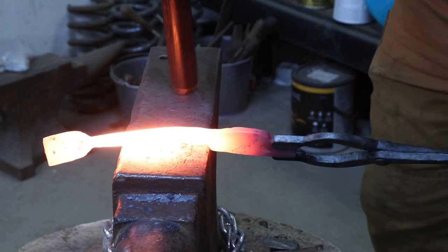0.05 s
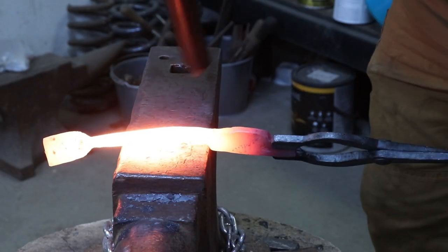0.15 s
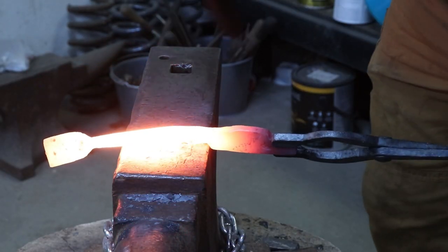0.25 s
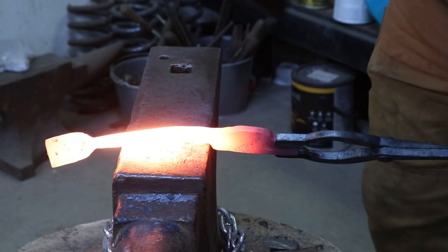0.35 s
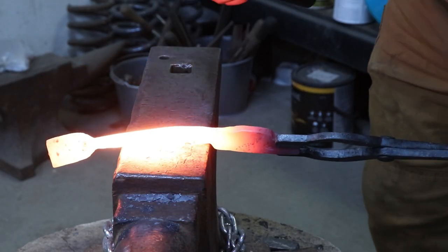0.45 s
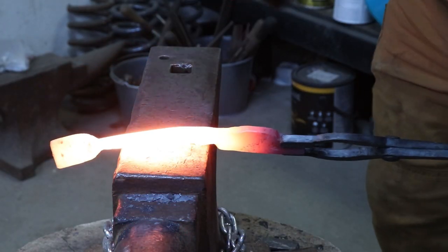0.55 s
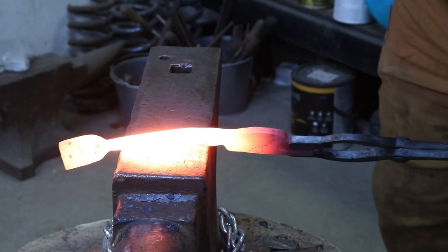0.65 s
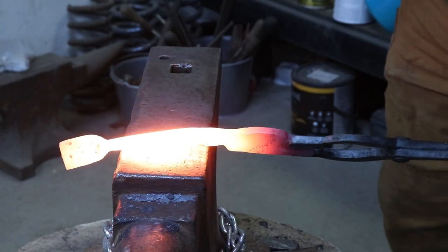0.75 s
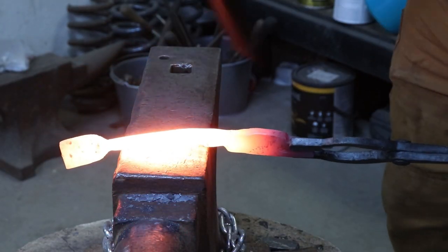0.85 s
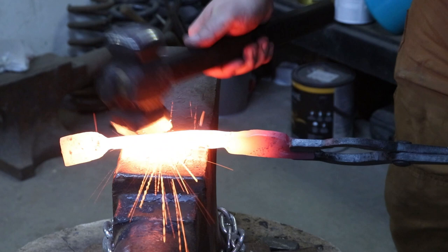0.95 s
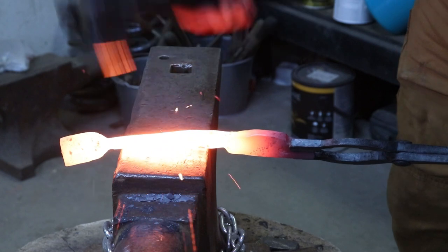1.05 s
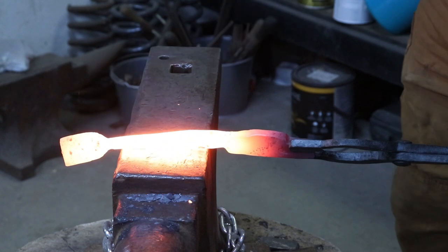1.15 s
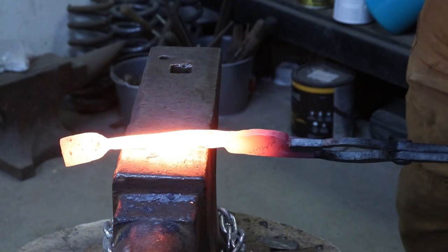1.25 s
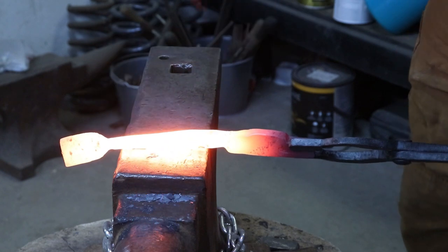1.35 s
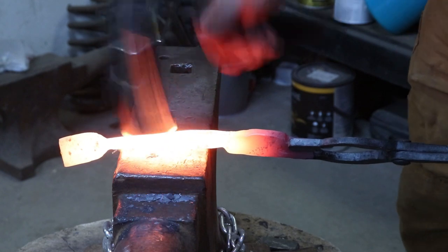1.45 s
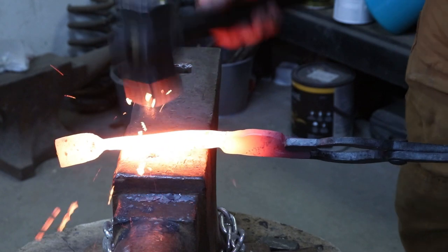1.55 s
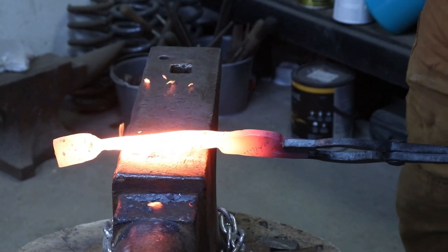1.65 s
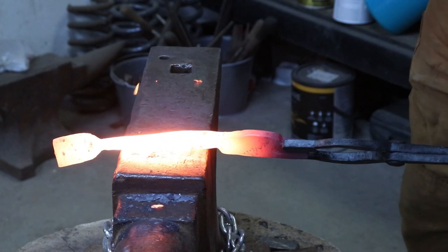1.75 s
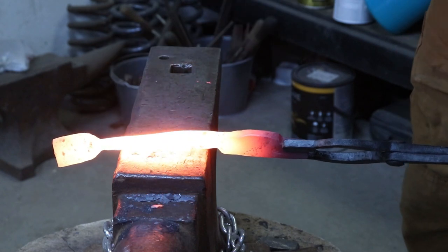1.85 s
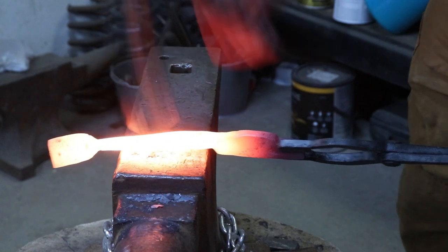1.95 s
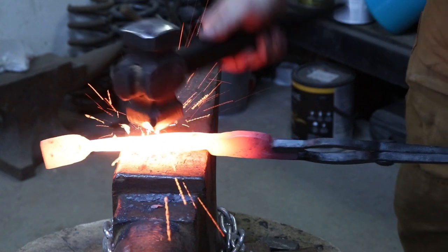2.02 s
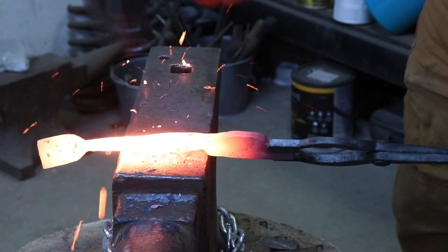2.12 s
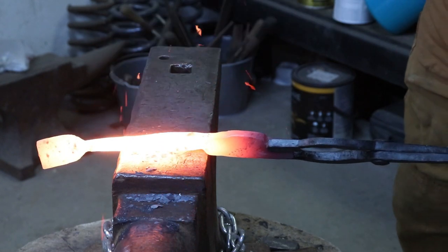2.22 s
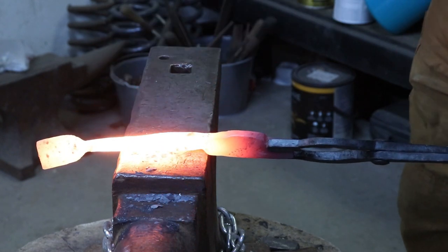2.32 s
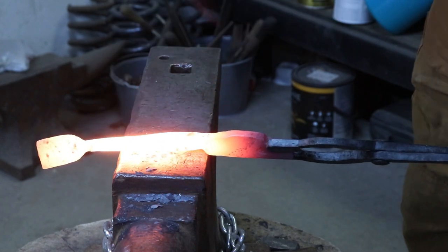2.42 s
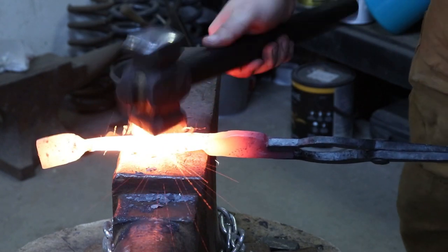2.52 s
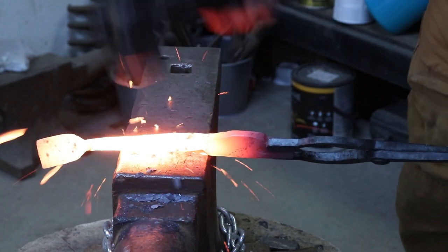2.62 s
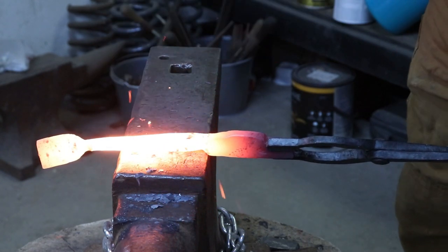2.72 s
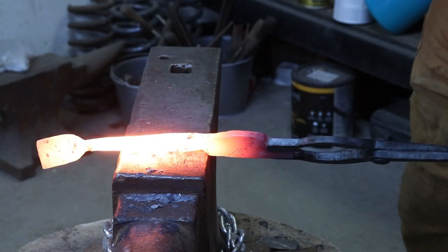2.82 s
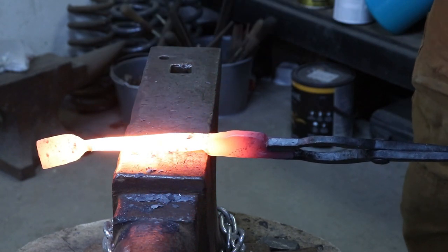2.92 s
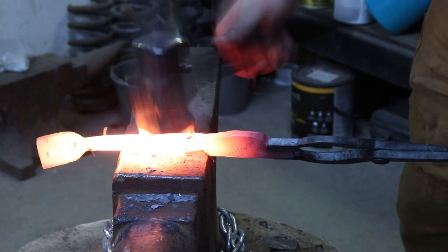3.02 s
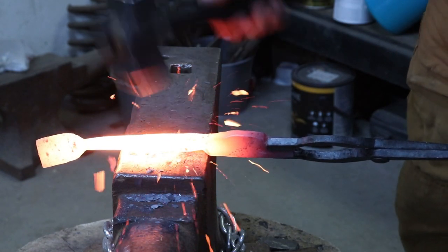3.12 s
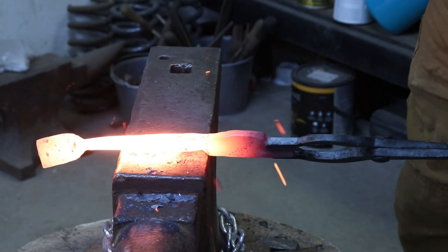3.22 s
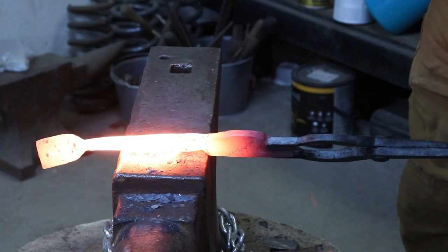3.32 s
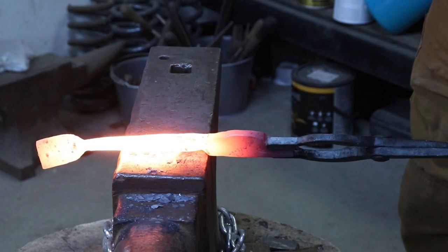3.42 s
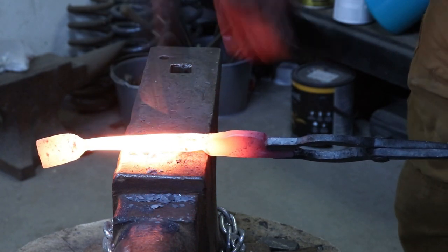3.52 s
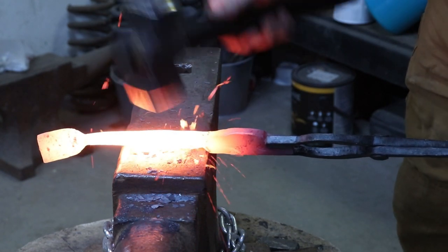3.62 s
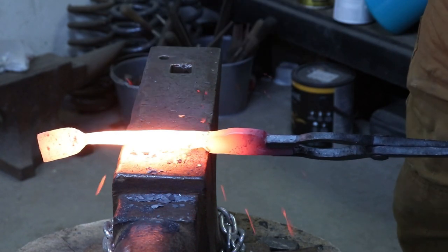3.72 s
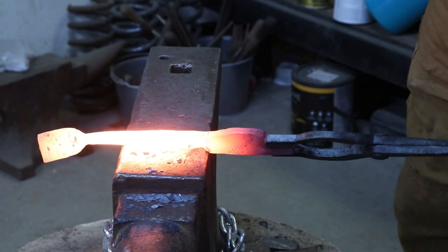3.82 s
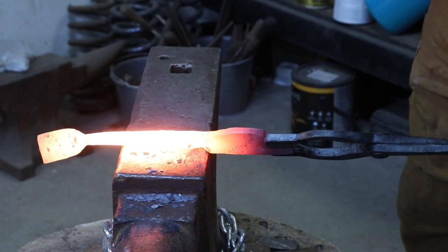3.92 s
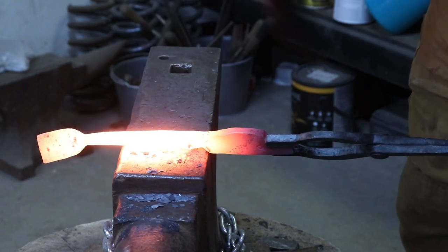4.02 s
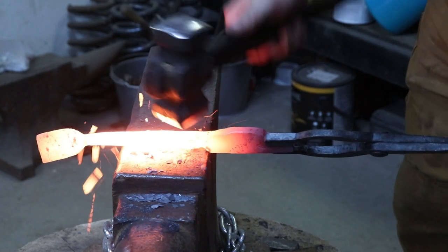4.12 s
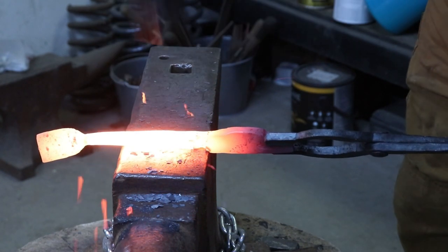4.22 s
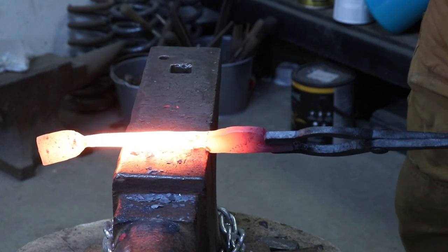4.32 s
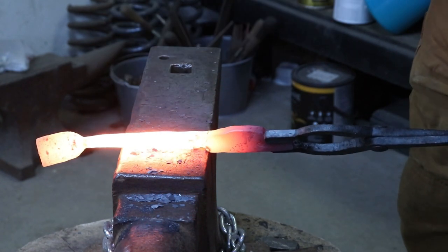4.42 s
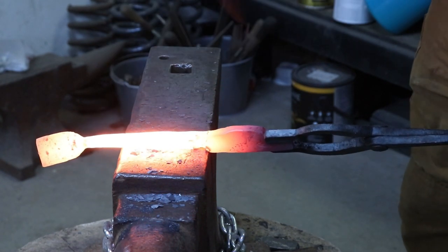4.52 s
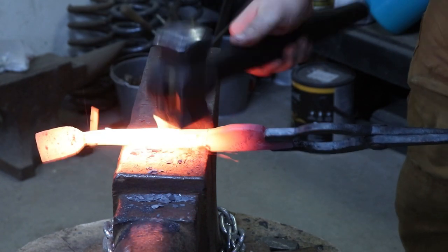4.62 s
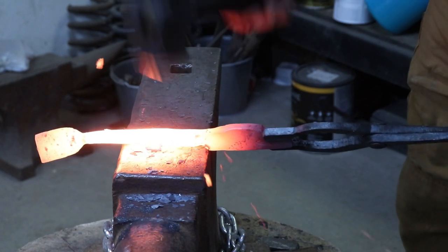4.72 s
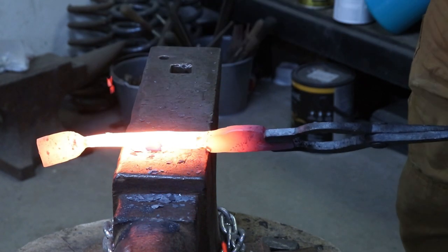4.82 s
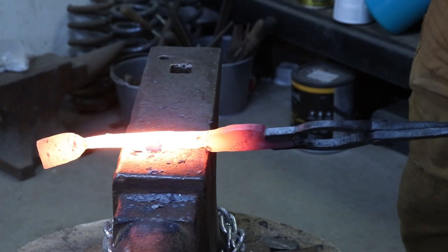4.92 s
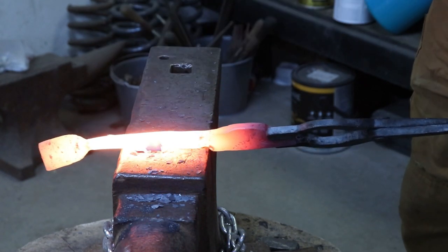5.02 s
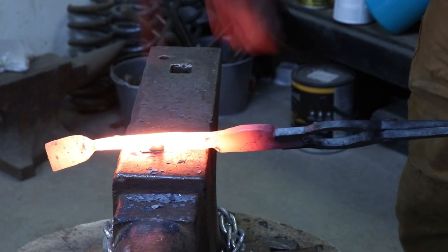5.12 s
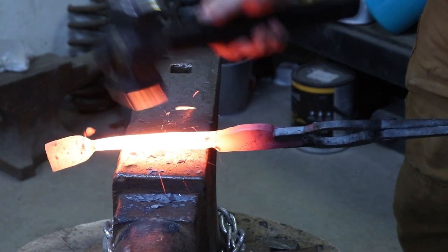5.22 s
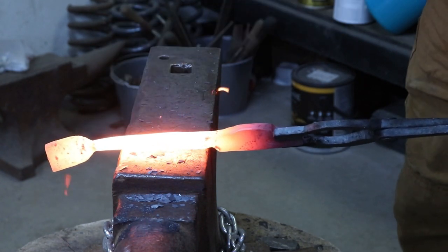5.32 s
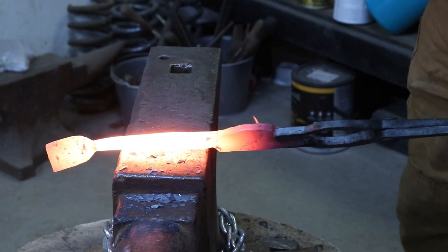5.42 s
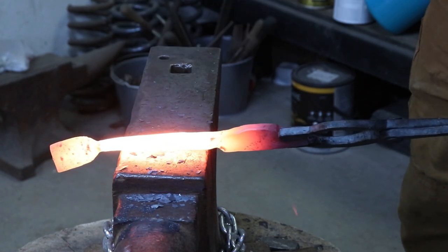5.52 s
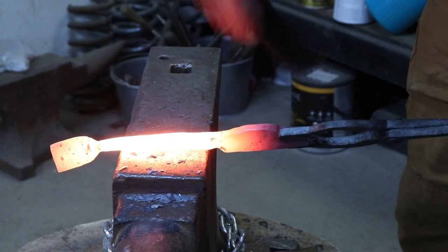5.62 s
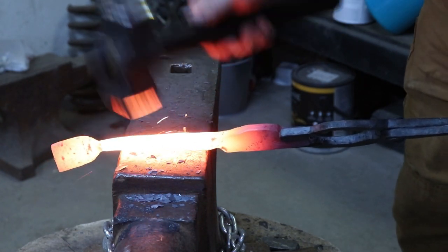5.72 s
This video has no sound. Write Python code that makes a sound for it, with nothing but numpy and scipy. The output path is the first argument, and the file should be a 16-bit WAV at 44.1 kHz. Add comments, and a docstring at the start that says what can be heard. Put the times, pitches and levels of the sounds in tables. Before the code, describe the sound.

A small forge heard from one close mono microphone, with a low rush of air that slowly swells and a very faint high anvil tone left from earlier work. At 0.1 s a cushioned hammer blow thuds with little ring, ends in a sharp snap and drops out until about 0.25 s. Two short dry tong scrapes come at 0.7 and 0.9 s. From 1.0 s to 5.25 s nine heavy blows fall evenly, roughly every 0.53 s. Each has a low stump thump fluttering in the room, a noisy steel clash, and a wavering bright anvil ring fading into boomy reverberation. The first is soft; later ones are mostly harder and brighter. Faint scale flakes tick near 2.45, 3.5, 4.0 and 4.6 s. Hits crunch with input overload; a dropout cuts in at 1.58 s and a tiny one at 4.71 s. The last ring decays over the air.

```python
"""A workshop's low rush of air swells slowly under the faint song of an anvil struck earlier.
A cushioned hammer blow on red-hot steel ends in a snap and a dropout; then the tongs scrape twice.
From one second on, about two blows a second thump the stump, clash, ring the anvil and boom in the room.
Flakes of scale tick between blows; contact grows mostly harder and brighter as the bar cools.
The blows drive the close microphone's input into overload, and two more dropouts cut into them."""
import sys
import numpy as np
from scipy import signal
from scipy.fft import rfft, irfft, next_fast_len
from scipy.io import wavfile
from scipy.ndimage import map_coordinates

SR = 44100
rng = np.random.default_rng(int(sys.argv[2]) if len(sys.argv) > 2 else 0)


def waveform_to_disk(signal):
    """Save audio, clipped to [-1, 1], as 16-bit WAV at the path in sys.argv[1]."""
    frames = np.transpose(np.atleast_2d(signal))
    scaled = np.clip(frames, -1, 1) * 32767
    samples = np.round(scaled).astype(np.int16)
    wavfile.write(sys.argv[1], SR, samples)


N = 254016
T = np.arange(SR) / SR  # time since the onset of a sound, s

# the anvil's ringing modes: f/Hz, slow beat/Hz (mean), slow-beat depth/0-1, fast-beat depth/0-1
ANVIL_MODES = [(1611, 5.3, .6, .45), (2443, 1.6, .7, .12), (3386, 1.9, .35, .1), (6165, 11, .35, .2),
               (9622, 7, .25, .1), (13576, 22, .7, .3), (15051, 5, .3, .2)]


def amp(db):
    """Decibels to gain."""
    return 10 ** (np.asarray(db) / 20)


def unit(x):
    """Scale to rms 1."""
    return x / np.sqrt(np.mean(x ** 2) + 1e-20)


def along(points, hz):
    """Read (f/Hz, value) points on a log frequency axis."""
    f, v = np.transpose(points)
    return np.interp(np.log(hz + 1), np.log(f + 1), v)


def decay(t60):
    """Envelope that falls 60 dB in t60 seconds."""
    return np.exp(-np.log(1000) * T / t60)


def swell(seconds):
    """Envelope that builds up to 1 with this time constant."""
    return 1 - np.exp(-T / seconds)


def wobble(rate):
    """A smooth random curve, rate knots a second."""
    return map_coordinates(rng.standard_normal(64), [T * rate], mode="mirror")


def filtered(x, response):
    """Multiply the spectrum of x by a response of frequency."""
    size = next_fast_len(len(x) + SR // 4)
    hz = np.fft.rfftfreq(size, 1 / SR)
    return irfft(rfft(x, size) * response(hz), size)[:len(x)]


def noise(spectrum, size):
    """Noise of rms 1, coloured by (f/Hz, level/dB) points."""
    return unit(filtered(rng.standard_normal(size), lambda hz: amp(along(spectrum, hz))))


def add(track, s, sound):
    """Mix a sound into the track from time s."""
    part = track[max(round(s * SR), 0):][:len(sound)]
    part += sound[:len(part)]


def workshop():
    """A low rush of air: coloured noise whose level drifts slowly."""
    # colour of the air: f/Hz, relative level per Hz/dB
    air_colour = [(25, -26.5), (75, 2), (300, -0.5), (600, -7.5), (1400, -18), (4000, -24.5), (7000, -26),
                  (15000, -40)]
    # loudness of the air: t/s, rms level/dB
    air_level = [(0, -59), (.7, -58.5), (2, -55), (5.7, -53)]
    s, db = np.transpose(air_level)
    return amp(np.interp(np.arange(N) / SR, s, db)) * noise(air_colour, N)


def flakes():
    """Bits of scale fly off the bar and land with tiny ticks of bright, fast-fading noise."""
    # landings: t/s, level/dB (before the fade)
    landings = [(2.452, -49), (3.477, -47.5), (3.96, -56), (4.579, -49)]
    colour = [(1000, -15), (3000, -3), (10000, -8), (15000, -5)]
    out = np.zeros(N)
    for s, db in landings:
        add(out, s, amp(db) * noise(colour, SR) * decay(.025))
    return out


def tongs():
    """The jaws shift on the bar: short dry scrapes of noise."""
    # scrapes: t/s, level/dB (before the envelope)
    scrapes = [(0.713, -48.5), (0.896, -48)]
    colour = [(500, -21), (1900, -9.5), (5000, -12), (14000, -20.5)]
    out = np.zeros(N)
    for s, db in scrapes:
        add(out, s, amp(db) * noise(colour, SR) * swell(0.0012) * decay(0.071))
    return out


def push(delay, hz, peak_s):
    """A few heavy cycles that swell to a peak and die."""
    age = np.maximum(T - delay, 0)
    envelope = (age / peak_s * np.exp(1 - age / peak_s)) ** 2
    return np.sin(2 * np.pi * hz * age) * envelope


def thud():
    """The anvil bounces on its stump; the thump flutters floor to ceiling and standing waves boom on."""
    # standing waves of the workshop: f/Hz, level/dB (before the boom gain), t60/s
    standing_waves = [(70, -36, 1), (143, -33, .6), (173, -34, .5), (214, -22.5, .5), (240, -25, .42),
                      (274, -17, .45), (287, -16, .36), (311, -17, .44), (338, -20, .38), (355, -13.5, .33),
                      (393, -26, .4), (418, -21, .44), (688, -19, .33), (912, -29, .38), (956, -29, .42)]
    lag_s = .0022  # the bounce comes just after contact
    direct = push(lag_s, hz=288, peak_s=0.0062)

    trip_s = .0141  # round trip between floor and ceiling
    first_db, loss_db = -7.5, 4.2  # first echo, and loss for each further trip
    flutter = np.zeros(SR)
    for k in range(8):
        echo = push(lag_s + (k + 1) * trip_s, hz=304, peak_s=0.0077)
        flutter += amp(first_db - loss_db * k) * echo

    # a faint part of each standing wave lingers
    linger = amp(-43) * decay(0.52)
    boom = np.zeros(SR)
    for hz, db, t60 in standing_waves:
        wave = np.sin(2 * np.pi * (hz * T + rng.random()))
        boom += amp(db) * (decay(t60) + linger) * wave
    boom_db, boom_swell_s = 3, 0.015  # the standing waves build up slowly
    return direct + flutter + amp(boom_db) * boom * swell(boom_swell_s)


def clash(pattern, weight_db, hard_db, spot, cushion_db):
    """The crack of contact: noise coloured by damped steel modes and drawn out by the room."""
    # shared grain: f/Hz, share of the clash's power that repeats from blow to blow/0-1
    repeating = [(900, 1), (2000, 0.55), (3000, 0.67), (6000, .1)]
    # damped modes of hammer, tongs and anvil: f/Hz, width/Hz, level over the clash/dB (before cushioning)
    steel_modes = [(1513, 16, 13), (1600, 50, 11), (2066, 34, 9.5), (3490, 24, 17), (3720, 40, 7),
                   (4610, 40, 8), (5566, 12, 14), (5615, 20, 9), (6772, 22, 13), (8255, 20, 10),
                   (8870, 25, 19), (9113, 22, 23), (11470, 25, 14), (7560, 25, 9)]
    # colour of the contact: f/Hz, relative level per Hz/dB
    contact_colour = [(25, -26.5), (60, 2), (150, -1), (290, 13), (480, 0), (700, 2), (950, -1),
                      (1400, -2.5), (2200, -4.5), (2900, -11), (5000, -12), (8000, -17), (11000, -18.5),
                      (15500, -22.5)]
    # room tail: f/Hz, t60/s (before the extra early decay)
    room_tail = [(60, 0.16), (250, 0.65), (600, 0.46), (1500, 0.52), (4000, 0.53), (8000, 0.42),
                 (11000, 0.37), (15000, 0.46)]
    hz = np.fft.rfftfreq(SR, 1 / SR)

    # the paths through the room stay put, so the low part is alike each time
    same = np.clip(along(repeating, hz), 0, 1)
    fresh = rfft(rng.standard_normal(SR))
    grain = np.sqrt(same) * rfft(pattern) + np.sqrt(1 - same) * fresh

    peaks = sum(amp(db) ** 2 / (1 + (2 * (hz - centre) / width) ** 2)
                for centre, width, db in steel_modes)
    # a cushioned blow that leaves the anvil quiet also spares the lower steel modes
    mode_trim_db = (cushion_db - 9.5) * along([(5600, 0.22), (8800, 0)], hz)
    modes = np.sqrt(1 + peaks * amp(mode_trim_db))

    # weight sets the lows, cushioning shades the mids, hardness sets the highs, spot tilts the bite
    mid_db = weight_db + 0.34 * cushion_db
    bite_db = -0.5 + 0.26 * hard_db + 1.35 * spot
    sizzle_db = -3.9 + 0.83 * hard_db
    balance = [(400, weight_db), (1000, mid_db), (2600, bite_db), (8000, bite_db), (11000, sizzle_db)]
    burst = irfft(grain * unit(amp(along(contact_colour, hz))) * modes * amp(along(balance, hz)))

    # each frequency band fades at its own rate
    bands, age, z = signal.stft(burst, SR, nperseg=256)
    fade = np.exp(-np.log(1000) * age / along(room_tail, bands)[:, None])
    tail = signal.istft(z * fade, SR, nperseg=256)[1][:SR]
    return tail * swell(0.0069) * (1 + 1.67 * decay(0.062))  # strong early part over the tail


def ring(hard_db, spot, cushion_db):
    """The anvil's modes ring as beating, fading sines; hardness, spot and cushioning set their strength."""
    # ring of each mode, in order: level/dB, t60/s, swell/s, gain/dB per dB of hardness, gain/dB per unit of spot
    mode_rings = [(-4.5, 0.4, 0.0013, 0.08, -0.7), (-11.5, 0.57, 0.0082, .45, -2.5),
                  (-22.5, 0.64, 0.048, 0.6, 9.5), (-29.5, 0.45, 0.0057, 1.8, -5),
                  (-26.5, 0.77, 0.0014, 1.15, 0.7), (-23.5, .21, 0.0048, 1.7, -5),
                  (-58.5, .75, .01, -0.2, -4)]
    # soft bar: f/Hz, share of its cushioning that a mode feels/0-1
    cushion_share = [(2500, 1), (3400, 0.19), (9000, 0.28)]
    fast_beat_hz, beat_spread_hz = 15.5, 0.59  # fast beat; scatter of the slow beat from blow to blow
    after_db, after_stretch = -27.5, 1.9  # a faint part rings on: level, its t60 over the mode's
    out = np.zeros(SR)
    for mode, ringing in zip(ANVIL_MODES, mode_rings):
        hz, beat_hz, depth, fast_depth = mode
        db, t60, rise, per_hardness, per_spot_db = ringing
        strength_db = per_hardness * hard_db + per_spot_db * spot
        strength_db = strength_db + cushion_db * along(cushion_share, hz)
        phase = 2 * np.pi * (hz * T + rng.random())
        # the room's answer builds up slightly off pitch and beats against the mode, slowly and fast
        slow = 2 * np.pi * (beat_hz + beat_spread_hz * rng.standard_normal()) * (T - .018)
        fast = 2 * np.pi * fast_beat_hz * (T - .043)
        answer = swell(0.094) * (depth * np.sin(phase - slow) + fast_depth * np.sin(phase - fast))
        waver_db = 2.5 * wobble(rate=16) * swell(.2)  # the tail wavers
        fade = decay(t60) + amp(after_db) * decay(after_stretch * t60)
        level = amp(db + strength_db + waver_db)
        out += level * fade * swell(rise) * (np.sin(phase) + answer)
    return out


def hammer():
    """Every blow is a thud, a clash and, once the soft steel has yielded, the anvil's ring."""
    # blows: t/s, weight/dB, hardness of contact/dB, spot along the anvil face/about -1 to 1,
    # level passed through the soft bar to the anvil/dB
    blows = [(0.1191, -6, -5.5, 0.081, -27.5), (1.0287, -2.2, -12, -0.035, -2), (1.5593, 0, -2.5, 0.098, 1),
             (2.0693, 1, -3, -0.78, 1), (2.604, .5, 2.5, 0.18, 0), (3.1226, .5, -0.5, 0.75, -0.5),
             (3.6416, 0.5, -2, 0.58, -1), (4.1723, 0, 4.5, 0.39, 0.5), (4.7109, -1, 2, 0.92, 2),
             (5.251, -0.5, 3.5, -0.36, 1)]
    thud_db, clash_db = -1, -11  # gains before each blow's own weight and colour
    ring_delay_s = .006  # the soft bar yields first
    out = np.zeros(N)
    body = thud()
    pattern = rng.standard_normal(SR)

    # the anvil still sings faintly from earlier work
    song = np.sin(2 * np.pi * ANVIL_MODES[2][0] * T)
    add(out, 0, amp(-64) * decay(0.92) * song)
    for s, weight_db, hard_db, spot, cushion_db in blows:
        add(out, s, amp(thud_db + weight_db) * body)
        add(out, s, amp(clash_db) * clash(pattern, weight_db, hard_db, spot, cushion_db))
        add(out, s + ring_delay_s, ring(hard_db, spot, cushion_db))

    # the first, cushioned blow ends in a sharp snap
    snap = noise([(800, -11.5), (2200, 6), (4000, -6), (9000, -31.5)], SR) * decay(0.037)
    add(out, .1368, amp(-6.5) * snap)
    return out


def scene():
    """Everything sums at the one microphone."""
    return (hammer() + tongs() + flakes() + workshop())[None]


def saturate(x, top, order):
    """Round off the peaks at top; a higher order gives a sharper corner."""
    return x / (1 + np.abs(x / top) ** order) ** (1 / order)


def record(dry):
    """The input overloads and drops out; a bass cut tilts flat tops before full scale and band limit."""
    # dropouts: start t/s, end t/s, fade back/s
    dropouts = [(.138, .2, .055), (1.5802, 1.642, .045), (4.7143, 4.7205, .012)]
    t = np.arange(N) / SR
    x = saturate(dry[0], top=1.15, order=6)
    for start, end, fade in dropouts:
        x = x * np.where(t < start, 1, np.clip((t - end) / fade, 0, 1))
    bass_hz, top_hz = 120, 15700
    x = filtered(x, lambda hz: 1j * hz / (bass_hz + 1j * hz))
    x = saturate(x, top=1, order=40)
    return filtered(x, lambda hz: 1 / np.sqrt(1 + (hz / top_hz) ** 400))[None]


dry = scene()
out = record(dry)
waveform_to_disk(out)
```